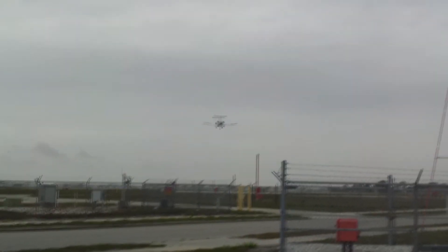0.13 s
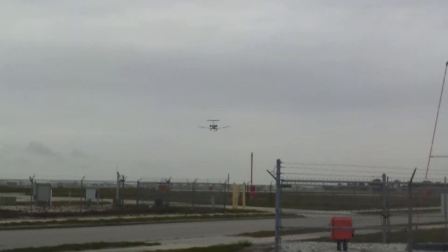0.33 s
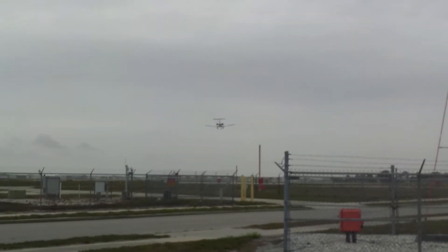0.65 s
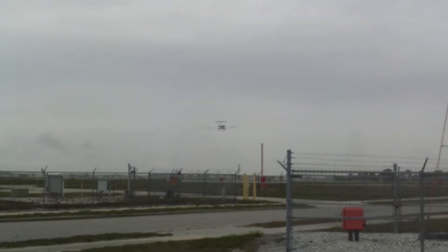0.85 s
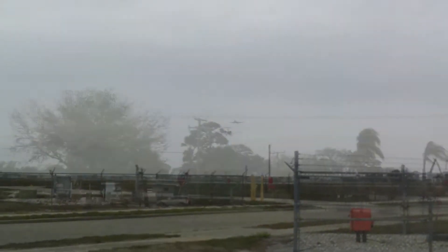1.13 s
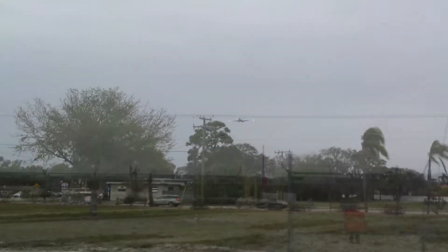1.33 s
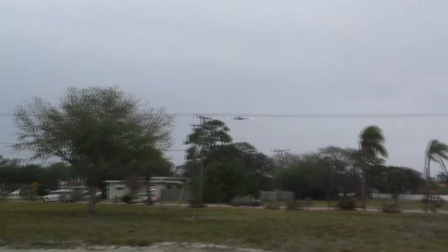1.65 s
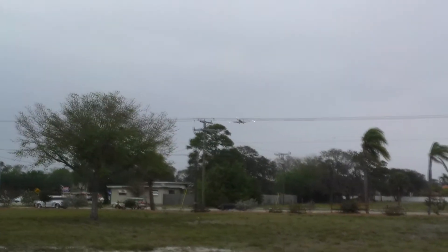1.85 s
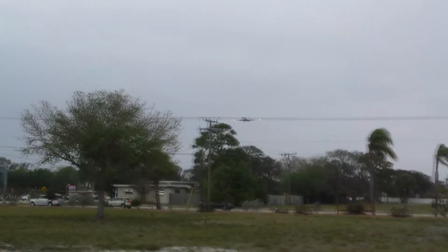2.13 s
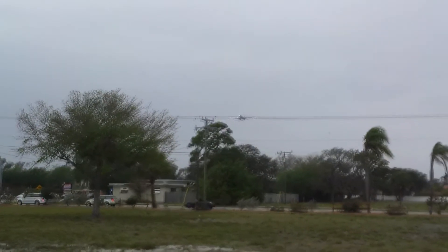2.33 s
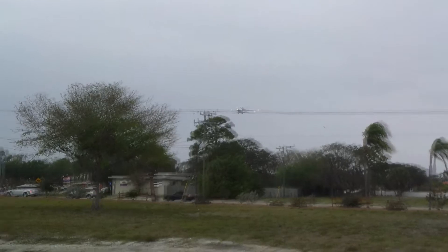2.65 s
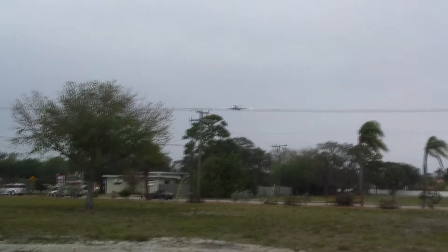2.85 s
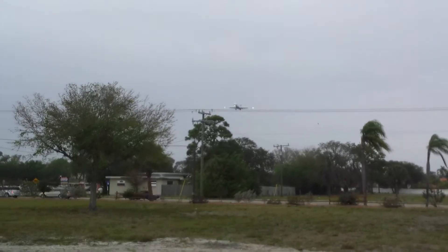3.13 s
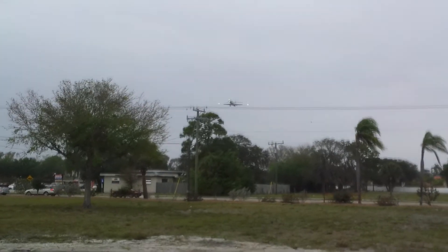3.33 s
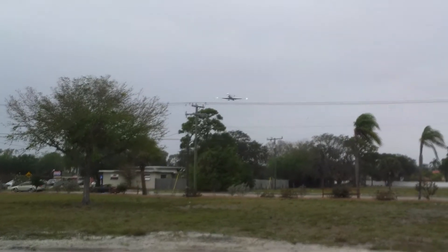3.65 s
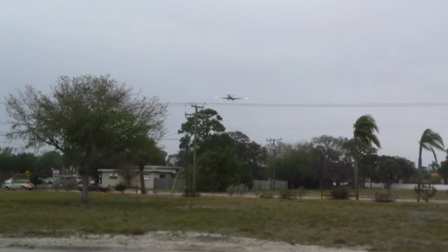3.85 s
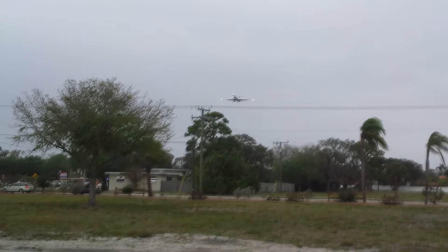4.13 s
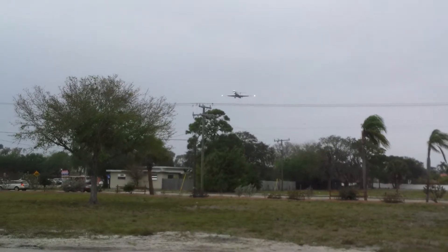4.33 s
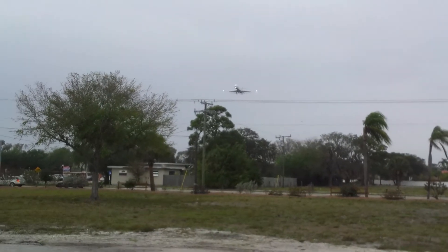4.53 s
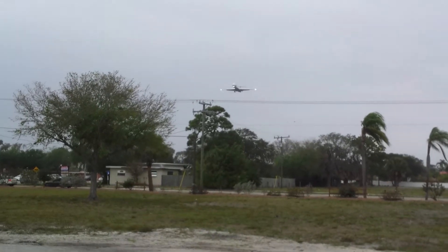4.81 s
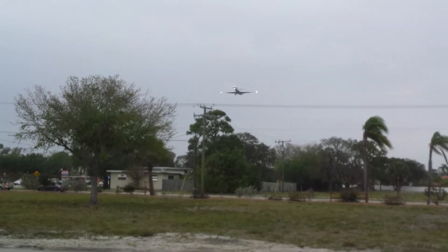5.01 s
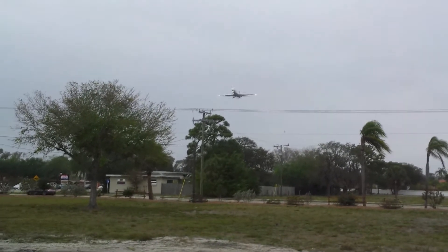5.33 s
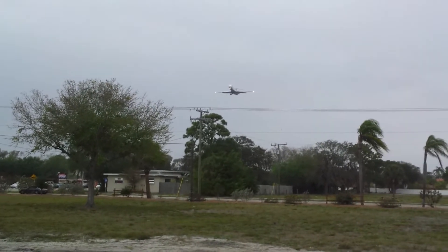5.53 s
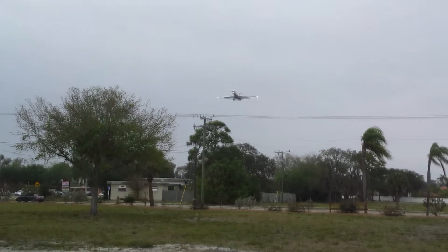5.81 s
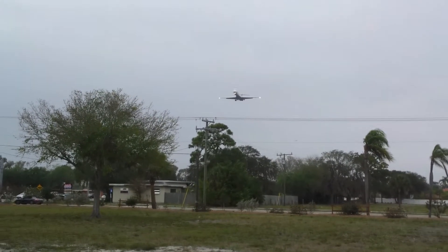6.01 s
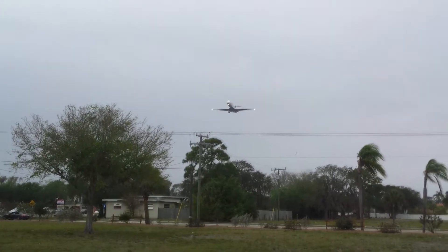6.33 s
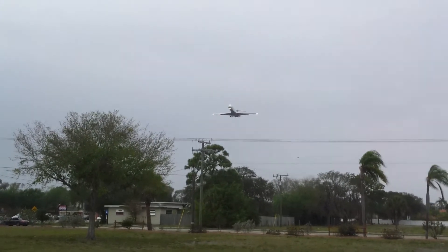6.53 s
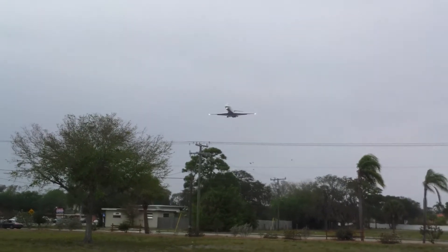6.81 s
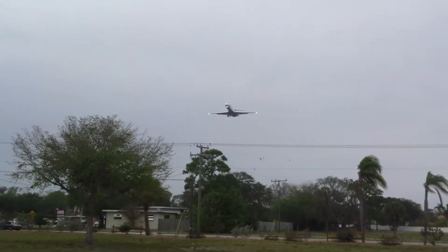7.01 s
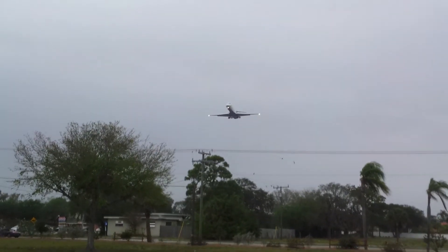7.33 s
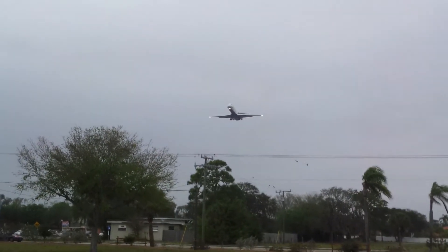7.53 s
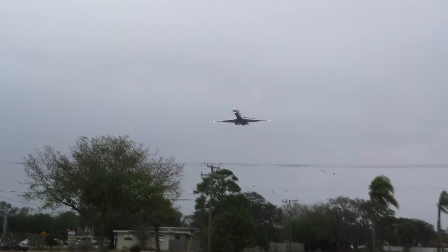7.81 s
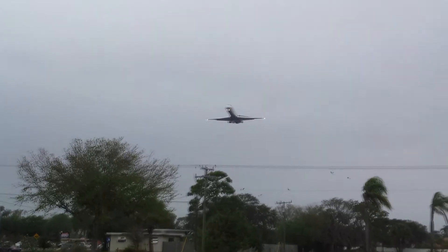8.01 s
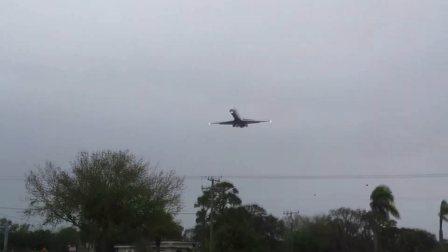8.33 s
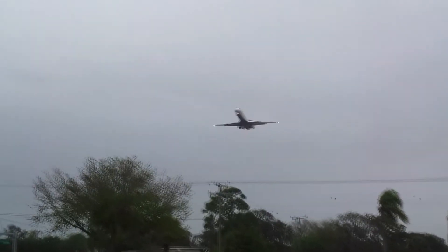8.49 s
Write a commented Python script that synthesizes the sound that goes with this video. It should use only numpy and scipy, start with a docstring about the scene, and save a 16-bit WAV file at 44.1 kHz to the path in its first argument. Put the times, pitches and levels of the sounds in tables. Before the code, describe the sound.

A jet's roar and whine fade away outdoors, then a second jet swells closer, its whine climbing, while gusty wind buffets and pops the microphone.

```python
"""Two jets on landing approach, heard one after the other from an open field on a gusty day.
First a nearer jet, shaped noise with a howl and blurred whines, fades away over a faint floor and thin whistles.
The second comes in from afar: its roar swells and brightens as the distance shrinks, and late on its
compressor whine, a chord of tones locked to one shaft, climbs as the engines spool up.
Throughout, wind rumbles, flutters, crackles and pops on the microphone: noise under gusts, and single pulses."""
import sys
import numpy as np
from scipy import signal
from scipy.fft import rfft, irfft, next_fast_len
from scipy.io import wavfile

SR = 44100
rng = np.random.default_rng(int(sys.argv[2]) if len(sys.argv) > 2 else 0)


def transcribe(signal):
    """Save signal, clipped to [-1, 1], as a 16-bit WAV file at the path in sys.argv[1]."""
    frames = np.atleast_2d(signal).T
    limited = np.clip(frames, -1, 1)
    pcm = np.round(limited * 32767).astype(np.int16)
    wavfile.write(sys.argv[1], SR, pcm)


N = 381906
TIME = np.arange(N) / SR


def from_db(db):
    """Decibels to gain."""
    return np.exp(np.asarray(db) * (np.log(10) / 20))


def rms_one(x):
    """Scale to unit rms."""
    return x / np.sqrt(np.mean(x ** 2) + 1e-20)


def in_time(rows):
    """Each column of a curve, interpolated at every sample."""
    seconds, *columns = np.transpose(rows)
    return [np.interp(TIME, seconds, column) for column in columns]


def drift(rate):
    """Smooth chance of spread 1 that changes about `rate` times a second."""
    step = 40  # samples between the points of the slow noise
    pole = np.exp(-2 * step * np.pi * rate / SR)
    white = rng.standard_normal(N // step + 2002)
    slow = signal.lfilter([1], [1, -2 * pole, pole * pole], white)[2000:]  # drop the run-in
    return np.interp(np.arange(N) / step, np.arange(len(slow)), rms_one(slow))


def noise_bands(spectrum, count):
    """Noise of rms 1 with the given spectrum, as (centre Hz, band) pairs that add up to the whole."""
    size = next_fast_len(N)
    octave = np.log2(np.maximum(np.arange(size // 2 + 1) * SR / size, 1))
    hz, db = np.transpose(spectrum)
    corners = np.log2(hz)
    outside = np.abs(octave - np.clip(octave, corners[0], corners[-1]))
    shape = from_db(np.interp(octave, corners, db) - 80 * outside)  # falls 80 dB per octave past the ends
    noise = irfft(rfft(rng.standard_normal(size)) * shape, size)
    whole = rfft(rms_one(noise))
    centres = np.linspace(corners[0], corners[-1], count)
    bands = []
    for centre, share in zip(centres, np.eye(count)):
        overlap = np.interp(octave, centres, share)  # neighbouring bands crossfade
        bands.append((2 ** centre, irfft(whole * overlap, size)[:N]))
    return bands


def absorption(hz):
    """Share of the treble loss that falls on a frequency: 0 at 4.7 kHz, 1 at 8 kHz, slightly negative below."""
    return np.clip((hz ** 2 - 4700 ** 2) / (8000 ** 2 - 4700 ** 2), -.15, 1.6)


def through_air(spectrum, shimmer_db, loss_db=0, count=8):
    """Engine noise after its way through turbulent air: bands shimmer, and `loss_db` tilts the treble."""
    heard = 0
    for hz, band in noise_bands(spectrum, count):
        heard = heard + band * from_db(shimmer_db * drift(10.5) - loss_db * absorption(hz))
    return heard


def whine(hz, width_hz, scatter, flicker_rate=14, fading_db=0, focus=0):
    """A tone of rms 1: turbulence blurs its pitch, it fades and flares, and scattered paths beat with the direct one.
    Focused sound arrives on top."""
    phase = 2 * np.pi * np.cumsum(hz + width_hz * drift(36.4)) / SR
    in_step = (1 + scatter * drift(flicker_rate)) * np.cos(phase)
    out_of_step = scatter * drift(flicker_rate) * np.sin(phase)
    fading = from_db(fading_db * np.minimum(drift(flicker_rate), 1))
    return rms_one((in_step + out_of_step) * fading) + focus * np.cos(phase)


def quiet_floor():
    """Far background and microphone hiss: steady shaped noise."""
    # floor spectrum: pitch_hz, level_db_per_hz
    floor_spectrum = [(60, 4.5), (250, .5), (380, -11), (500, -22), (660, -1), (1100, -.5), (1500, -8),
                      (2000, -19), (3100, -31), (4200, -19), (6200, -20), (7000, -24.5), (8000, -52),
                      (10500, -81.5)]
    return from_db(-37.5) * sum(band for hz, band in noise_bands(floor_spectrum, count=2))


def whistles():
    """Thin tones at constant level, faint enough to matter only while both jets are faint."""
    # whistles: pitch_hz, level_db
    whistle_tones = [(4935, -58), (5860, -59)]
    return sum(from_db(db) * whine(hz, width_hz=4, scatter=.35) for hz, db in whistle_tones)


def airflow(unrest_db=0.6, unrest_rate=14):
    """Rumble and flutter levels in dB: a restless breeze with the power of each gust added on top."""
    # breeze on the microphone between gusts: time_s, rumble_db, flutter_db
    breeze = [(0.0, -24, -26), (0.9, -30, -31.5), (1.45, -28.5, -30.5), (1.85, -36, -34),
              (2.15, -34, -33.5), (2.75, -37.5, -33.5), (3.05, -33, -25), (3.65, -27, -22),
              (4.2, -33, -29.5), (4.6, -33.5, -29.5), (4.82, -32, -24.5), (5.0, -28.5, -21),
              (5.55, -29.5, -26), (6.05, -31.5, -34), (7.1, -28.5, -31.5), (7.35, -29.5, -30),
              (7.55, -30.5, -30), (8.66, -27.5, -32.5)]
    # gusts: start_s, length_s, rumble_db, flutter_db
    gust_rows = [(0.018, .1, -16, -23.5), (0.16, .03, -18, -20.5), (0.223, 0.12, -13, -23.5),
                 (0.38, .07, -19, -24), (0.612, 0.068, -16, -23), (0.769, 0.098, -21.5, -28.5),
                 (1.179, 0.13, -20.5, -26.5), (1.51, .045, -21.5, -34), (1.585, 0.019, -40, -27.5),
                 (1.634, 0.028, -23.5, -27), (1.755, .025, -31, -25.5), (1.93, .04, -23.5, -28),
                 (1.981, .065, -29, -24), (2.839, 0.069, -21, -20.5), (3.022, 0.044, -29, -19),
                 (3.13, 0.055, -26, -22), (3.215, 0.025, -33, -17), (3.27, .11, -30, -22.5),
                 (3.43, .22, -26.5, -20), (3.743, .145, -23.5, -20.5), (3.92, .075, -24, -30),
                 (4.085, 0.026, -25, -24), (4.24, 0.065, -27, -30.5), (4.493, 0.048, -32, -19),
                 (4.675, .03, -26, -22.5), (4.86, .06, -28, -23.5), (4.925, 0.072, -27, -17),
                 (5.09, 0.023, -28, -22), (5.239, .12, -33, -19), (5.40, 0.061, -21, -20.5),
                 (5.535, .13, -34, -23.5), (5.722, 0.036, -27, -21.5), (6.09, .13, -27, -30),
                 (6.417, 0.047, -26, -30.5), (6.778, 0.2, -26.5, -28), (7.22, 0.044, -23, -27),
                 (7.347, .06, -32, -26.5), (7.478, .03, -25, -27), (7.728, 0.048, -21.5, -25.5),
                 (8.395, .03, -30, -20.5)]
    attack_s, release_s = .01, .011  # every gust rises, holds and dies away alike
    power = from_db(np.array(in_time(breeze)) + unrest_db * drift(unrest_rate)) ** 2
    for start, length, rumble_db, flutter_db in gust_rows:
        first = int(max(start, 0) * SR)
        last = int((start + length + 10 * release_s) * SR)
        age = TIME[first:last] - start
        shape = np.clip(age / attack_s, 0, 1) * np.exp(-np.maximum(age - length, 0) / release_s)
        power[:, first:last] += np.outer(from_db([rumble_db, flutter_db]), shape) ** 2
    return 10 * np.log10(power)


def eddies(rows, spread=1.06):
    """Each eddy (time s, peak dB, nominal pitch Hz) crosses the port as one quick push and pull, with soft skirts."""
    pressure = np.zeros(N)
    for s, db, hz in rows:
        close = slice(max(int((s - .03) * SR), 0), int((s + .03) * SR))
        u = 2 * np.pi * hz * (s - TIME[close]) / spread
        pressure[close] += from_db(db) * 16 * u / (3 + u * u) ** 2  # peaks at 1 where u is 1
    return pressure


def crackle(gust, strength, crackle_db=-4, size_db=2.3, follows=0.36):
    """Tiny eddies of uneven size come at random and stand out most in strong gusts."""
    per_s, low_hz, high_hz = 170, 400, 900  # pitches are nominal
    when, size, pitch = rng.random((int(per_s * N / SR), 3)).T
    at = (when * N).astype(int)
    unevenness = size_db * np.minimum(-np.log(1 - size), 2)
    db = gust[at] + follows * strength[at] + crackle_db + unevenness
    return eddies(zip(TIME[at], db, low_hz * (high_hz / low_hz) ** pitch))


def wind(rumble_db=-0.1, flutter_db=-0.27, strong_gust_db=-25, brightening=0.26,
         rumble_shift=0.22, lumps_db=2.1, lump_rate=110):
    """Large eddies rumble; a stronger gust sheds smaller eddies, so it flutters brighter, in lumps, and crackles."""
    # rumble of large eddies: pitch_hz, level_db_per_hz
    rumble_spectrum = [(24, -66), (35, -25), (50, -7.5), (65, -1), (90, -1.5), (130, -1.5), (190, -10),
                       (320, -21)]
    # flutter of smaller eddies: pitch_hz, level_db_per_hz
    flutter_spectrum = [(70, -10), (130, -1.5), (200, -1), (300, -3.5), (450, -8.5), (700, -15),
                        (1100, -27.5), (1700, -33.5), (2800, -43.5)]
    rumble_level, gust = airflow()
    strength = np.minimum(gust - strong_gust_db, 3)  # dB
    rumble, flutter = 0, 0
    for hz, band in noise_bands(rumble_spectrum, count=4):
        rumble = rumble + band * from_db(rumble_shift * np.log2(hz / 90) * strength)
    lumps = np.minimum(drift(lump_rate), 1.6)
    for hz, band in noise_bands(flutter_spectrum, count=7):
        smallness = max(np.log2(hz / 200), 0)  # small eddies come most unevenly
        uneven = rms_one(from_db(lumps_db * (1.5 + .5 * smallness) * lumps))
        flutter = flutter + band * uneven * from_db(brightening * smallness * strength)
    rumble = from_db(rumble_level + rumble_db) * rumble
    flutter = from_db(gust + flutter_db) * flutter
    return rumble + flutter + crackle(gust, strength)


def pops():
    """The hardest eddies, each heard as a knock."""
    # single eddies as they hit the port: time_s, peak_db, nominal_pitch_hz
    hard_eddies = [(0.236, -4, 280), (0.296, -10, 350), (0.85, -13, 380), (1.598, -14, 300),
                   (1.642, -13, 330), (1.777, -17, 380), (1.979, -13, 300), (2.011, -17, 320),
                   (2.860, -12, 460), (2.885, -8, 600), (3.042, -14, 800), (3.060, -1.5, 696),
                   (3.183, -15, 620), (3.226, -6, 536), (3.340, -13, 700), (3.368, -5.5, 450),
                   (3.421, -8, 450), (3.444, -11, 550), (3.512, -10, 550), (3.558, -5, 500),
                   (3.588, 0, 560), (3.753, -15, 450), (3.788, -6.5, 480), (3.804, -4, 380),
                   (3.820, -10, 420), (3.852, -12, 300), (4.108, -6, 850), (4.1103, 2.5, 620),
                   (4.506, -13, 650), (4.522, -6.5, 630), (4.692, -6.5, 644), (4.865, -12, 450),
                   (4.886, -8, 480), (4.907, -8.5, 480), (4.920, -6, 470), (4.928, -7, 300),
                   (4.952, -6, 300), (4.958, -2, 720), (4.973, -10, 600), (4.979, -1, 720),
                   (5.057, -13, 700), (5.106, -5.5, 850), (5.113, -10, 480), (5.179, -11, 420),
                   (5.275, -7.5, 650), (5.302, -6, 615), (5.346, -7, 450), (5.355, -7, 330),
                   (5.435, -7, 400), (5.540, -8, 260), (5.659, -12.5, 480), (7.242, -4.5, 400),
                   (7.358, -10, 260), (7.403, -13, 520), (7.493, -7, 800), (8.402, -12, 550)]
    return eddies(hard_eddies)


def port(pressure, dull_hz=1800):
    """The microphone port drops the deepest bass, rounds the hardest pushes of air and keeps them dull."""
    thinned = signal.sosfilt(signal.butter(4, 39, "high", fs=SR, output="sos"), pressure)
    rounded = .8 * np.tanh(thinned / .8)
    return signal.sosfilt(signal.butter(3, [15, dull_hz], "band", fs=SR, output="sos"), rounded)


def first_jet(roar_db=0.97, hiss_db=-1.14):
    """A nearer jet: broad roar, hiss, a hollow howl and blurred whines, all fading out together."""
    # level of the whole jet: time_s, level_db
    fade = [(0.0, -27.5), (0.36, -26), (0.52, -24.3), (0.75, -26.5), (1.0, -27.2), (1.2, -29.0),
            (1.588, -36.5), (1.76, -45.5), (2.0, -59)]
    # roar, then hiss: pitch_hz, level_db_per_hz
    roar_spectrum = [(240, -71), (400, -15), (520, -5.5), (610, 0.5), (762, -.5), (890, -6.5), (1160, 0.5),
                     (1390, -6.5), (1530, -3), (1820, -2.5), (2220, -10), (2440, -11), (2880, -18.5),
                     (3200, -21), (4160, -55), (7040, -120)]
    hiss_spectrum = [(1760, -32), (3000, -9), (4170, 1), (5830, -5), (5960, -5.5), (6320, -0.5),
                     (7430, -12), (8700, -18), (9480, -17.5), (10900, -33), (14200, -62), (22000, -120)]
    # whines: pitch_hz, level_db against the jet's level, width_hz
    whine_rows = [(2478, -20, 14), (4030, -19, 40), (4930, -18, 12), (6128, -11.5, 28), (6300, -16, 70),
                  (9195, -27, 60)]
    # hollow howl in the roar: time_s, pitch_hz, level_db against the jet's level
    howl_curve = [(0.0, 639, -14), (0.36, 601, -11), (0.43, 600, -1), (0.54, 625, -8), (0.8, 611, -14),
                  (1.3, 620, -20)]
    level, = in_time(fade)
    roar = from_db(roar_db) * through_air(roar_spectrum, shimmer_db=1.0)
    hiss = from_db(hiss_db) * through_air(hiss_spectrum, shimmer_db=1.06)
    tones = sum(from_db(db) * whine(hz, width, scatter=0.56) for hz, db, width in whine_rows)
    howl_hz, howl_db = in_time(howl_curve)
    howl = from_db(howl_db) * whine(howl_hz, width_hz=21.7, scatter=.6)
    ending = np.interp(TIME, [1.8, 2.1], [1, 0])
    return from_db(level) * ending * (roar + howl + hiss + tones)


def surges(order, focus_db=-1.8):
    """The moving air briefly focuses one blade tone on the listener: smooth flares, as a gain at every sample."""
    # flares: time_s, multiple of the shaft rate, length_s, level_db over that tone before the focus_db trim
    flares = [(2.09, 24, .08, 10), (2.28, 28, .06, 8), (2.393, 24, 0.13, 10), (2.51, 24, .05, 7),
              (2.858, 28, .06, 10), (2.87, 24, .05, 8), (3.053, 24, .06, 10), (3.525, 28, .075, 10),
              (3.57, 24, 0.053, 3), (3.65, 24, .05, 4), (3.73, 28, .13, 7), (3.80, 33, .05, 13),
              (3.82, 28, .05, 5), (3.87, 24, .06, 6), (3.97, 24, .05, 7), (4.09, 28, .04, 8),
              (4.20, 28, .04, 8), (4.49, 28, .07, 9), (4.96, 24, .045, 11), (5.068, 28, .045, 12),
              (5.16, 28, .07, 11), (5.317, 33, .05, 10), (5.40, 24, .05, 6), (5.71, 28, .05, 8),
              (5.767, 28, 0.045, 8), (5.78, 33, .04, 8), (5.842, 24, .055, 9), (6.07, 28, .045, 11),
              (6.29, 28, 0.037, 11), (6.37, 24, .06, 8), (6.43, 28, .05, 4), (6.56, 28, .045, 8),
              (7.14, 28, .04, 7), (7.20, 24, 0.049, 9), (7.51, 28, .04, 5), (8.03, 33, 0.065, 7),
              (8.09, 24, 0.14, 7), (8.37, 28, .06, 5.5)]
    gain = 0
    for s, multiple, length, db in flares:
        if round(multiple) == order:
            gain = gain + from_db(db + focus_db) * np.exp(-(2 * (TIME - s) / length) ** 2)
    return gain


def second_jet(roar_db=-22.0, hiss_db=-27.5, tones_db=-30.3, close_roar_db=-28.0):
    """Roar, fan hiss and blade tones locked to one shaft; all swell and brighten as the distance shrinks."""
    # swelling and sinking on the way through moving air: time_s, level_db
    carry = [(1.8, 1), (2.55, 0), (3.1, 2.5), (3.38, 5), (3.52, 8), (3.7, 4.3), (4.2, -0.8), (4.8, -3),
             (5.4, -0.9), (6.22, 0.4), (6.85, -1.4), (7.25, .5), (7.75, -.6), (8.4, 1.5), (8.66, -.5)]
    # engines spooling up: time_s, shaft_turns_per_s
    shaft_curve = [(2.0, 168.6), (3.0, 168.7), (4.0, 168.2), (5.5, 167.8), (7.05, 167.6), (7.35, 169.8),
                   (7.65, 174.3), (8.0, 180.8), (8.3, 184.8), (8.66, 188.6)]
    # compressor tones: multiple of the shaft rate, far_db, close_db
    blade_tones = [(17, -16.5, -13.5), (24, -5.0, -1.6), (28, -4.2, -5.4), (30, -10.5, -18),
                   (31, -10.5, -17), (33, -5, -10.5), (34, -10, -15), (41, -14, -30)]
    # roar, then hiss at close range: pitch_hz, level_db_per_hz
    roar_spectrum = [(76, -39.5), (130, -6.5), (202, 2), (247, -6.5), (310, -7.5), (341, -11.5), (395, -7),
                     (477, -14.5), (545, -15.5), (615, -11), (680, -11.5), (820, -5.3), (1080, -12),
                     (1500, -10.5), (2150, -10.2), (2700, -20.4), (3200, -24.3), (4160, -48), (7040, -120)]
    hiss_spectrum = [(1760, -43.5), (3000, -20.5), (3560, -7), (4360, 0.6), (4790, -0.5), (5270, 0),
                     (6390, -7), (6900, -11), (7580, -21), (8860, -27), (10000, -53), (13000, -83),
                     (22000, -120)]
    # extra mid-low roar of the jet exhaust, only at close range: pitch_hz, level_db_per_hz
    close_roar_spectrum = [(430, -24), (500, -9), (625, 0.5), (670, -4), (750, 0.5), (1000, -8),
                           (1400, -9.5), (2200, -24)]

    # it flies straight in; roar and hiss have their base levels at close_m
    start_m, speed_m_per_s, close_m = 800, 70, 230
    beam_m = 310  # inside this range the chord changes and the tones blur
    far_width_hz, close_width_hz = 9.97, 16.9
    far_scatter, close_scatter = .9, .35  # scattered paths against the direct one
    roar_loss_db_per_m, hiss_loss_db_per_m = .0108, .027
    # extra loss at 8 kHz: none at clear_m, a lift when nearer, capped from afar before swells dull it
    treble_loss_db_per_m, clear_m, most_treble_loss_db = 0.0779, 278, 15
    swell_dulling = 1.0  # dB of treble lost for each dB of swell
    tone_swell = 0.089  # tones swell and sink more deeply than noise: extra dB for each dB

    (carry_db,), (shaft,) = in_time(carry), in_time(shaft_curve)
    distance = start_m - speed_m_per_s * TIME
    beyond = distance - close_m
    distance_loss_db = np.minimum(treble_loss_db_per_m * (distance - clear_m), most_treble_loss_db)
    loss_db = distance_loss_db + swell_dulling * np.maximum(carry_db, 0)
    near = np.clip((beam_m - distance) / max(beam_m - close_m, 1), 0, 1)
    width = far_width_hz + near * (close_width_hz - far_width_hz)
    scatter = far_scatter + near * (close_scatter - far_scatter)

    roar_level = from_db(roar_db - roar_loss_db_per_m * beyond)
    roar = roar_level * through_air(roar_spectrum, shimmer_db=1.16, count=12)
    close_roar_level = from_db(close_roar_db) * near ** 2
    close_roar = close_roar_level * through_air(close_roar_spectrum, shimmer_db=1.2, count=4)
    hiss = from_db(hiss_db) * through_air(hiss_spectrum, shimmer_db=0.66, loss_db=loss_db)
    tones = 0
    for order, far_db, close_db in blade_tones:
        hz = order * shaft
        # each tone beams its own way out of the inlet, so the chord changes as the jet closes in
        db = far_db + near * (close_db - far_db) - loss_db * absorption(hz)
        tone = whine(hz, width, scatter, flicker_rate=21, fading_db=1.7, focus=surges(order))
        tones = tones + from_db(db) * tone
    tones_level = from_db(tones_db + tone_swell * carry_db) * np.interp(TIME, [1.7, 2.3], [0, 1])
    fan = from_db(-hiss_loss_db_per_m * beyond) * (hiss + tones_level * tones)
    entry = np.interp(TIME, [1.2, 1.95], [0, 1])
    return entry * from_db(carry_db) * close_m / distance * (roar + close_roar + fan)


def scene():
    """Both jets over the quiet of the field, and the wind at the microphone."""
    field = quiet_floor() + whistles()
    gusty_air = port(wind() + pops())
    return (field + gusty_air + first_jet() + second_jet())[None, :]


def record(dry):
    """The top is cut above 11 kHz, and the sound closes without a click."""
    closing = np.minimum((TIME[-1] - TIME) / .003, 1)  # 3 ms
    top_cut = signal.ellip(10, .1, 80, 11000, fs=SR, output="sos")
    return signal.sosfilt(top_cut, dry) * closing


dry = scene()
out = record(dry)
transcribe(out)
```